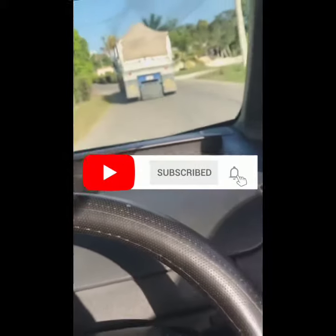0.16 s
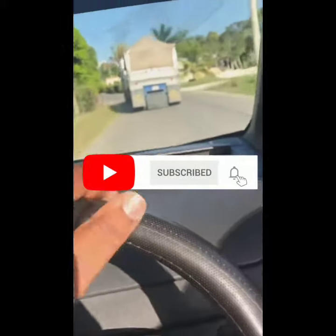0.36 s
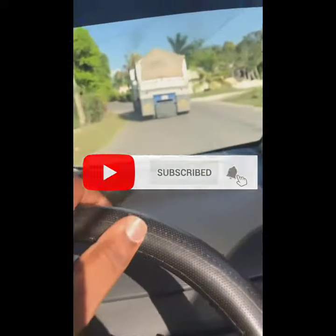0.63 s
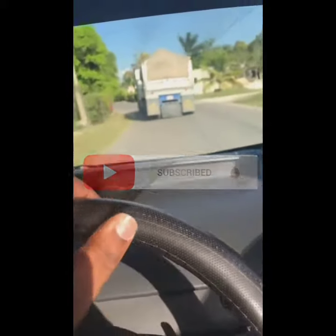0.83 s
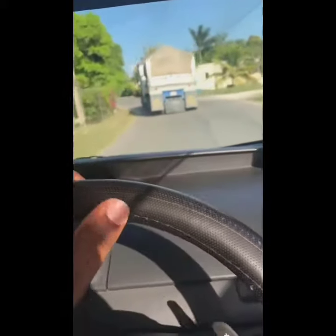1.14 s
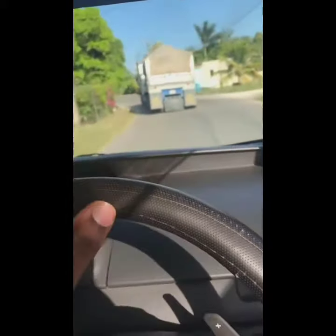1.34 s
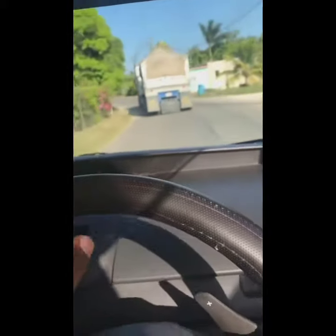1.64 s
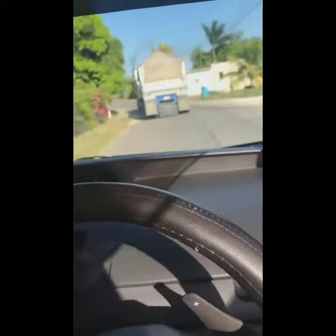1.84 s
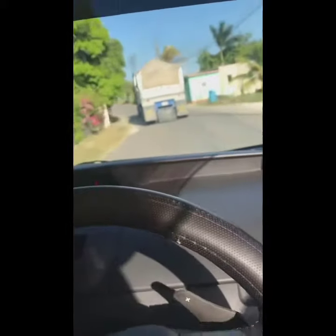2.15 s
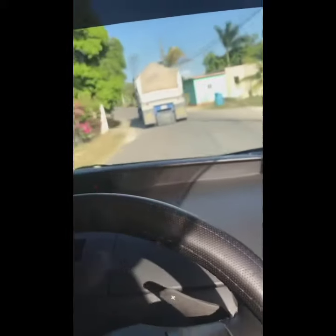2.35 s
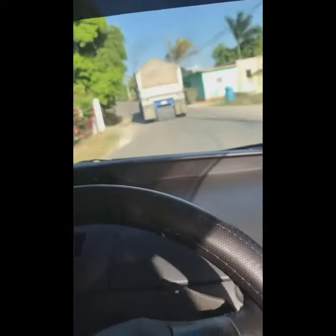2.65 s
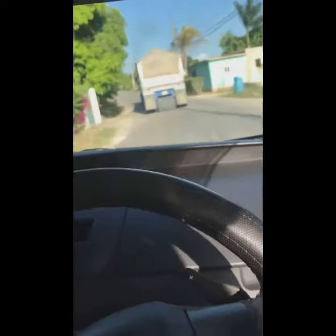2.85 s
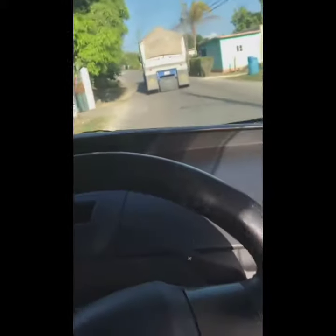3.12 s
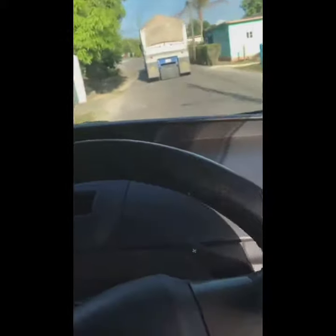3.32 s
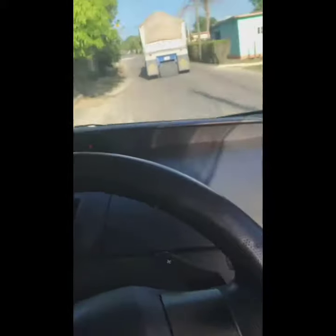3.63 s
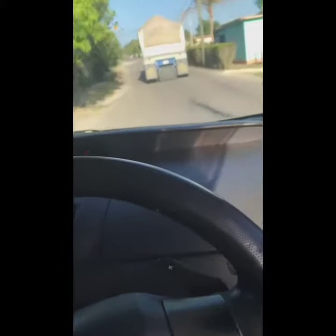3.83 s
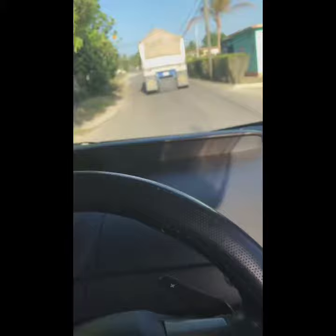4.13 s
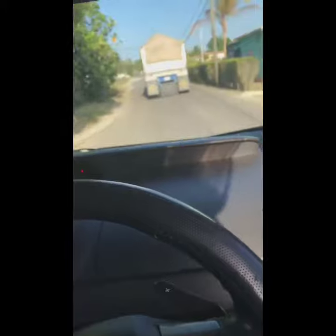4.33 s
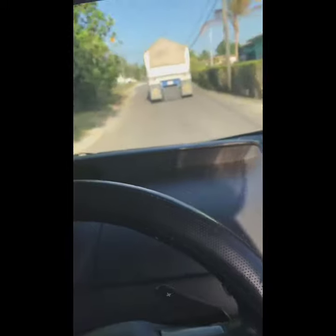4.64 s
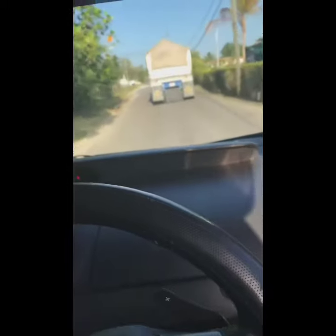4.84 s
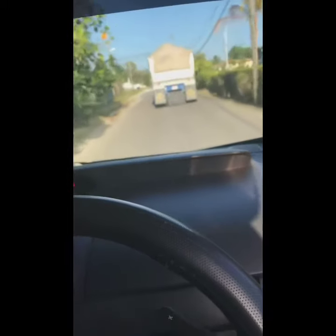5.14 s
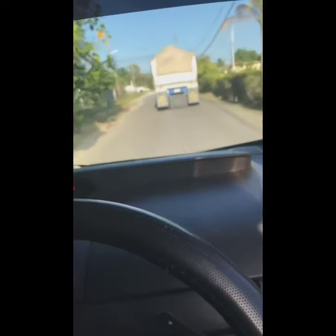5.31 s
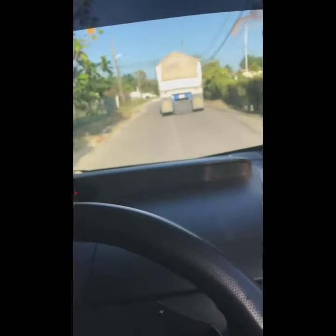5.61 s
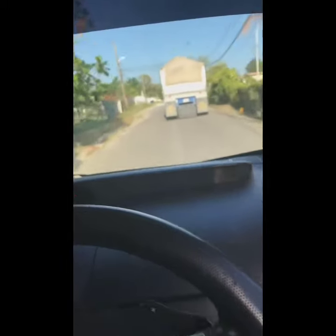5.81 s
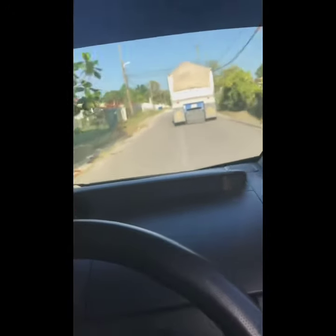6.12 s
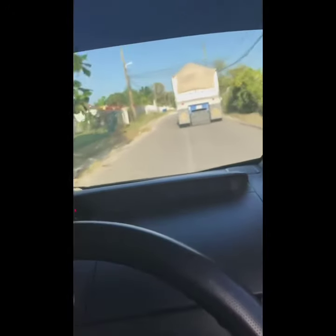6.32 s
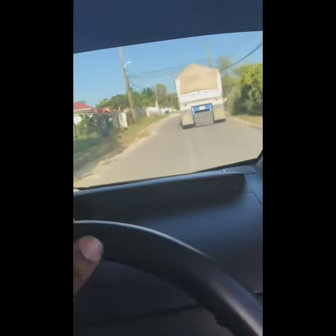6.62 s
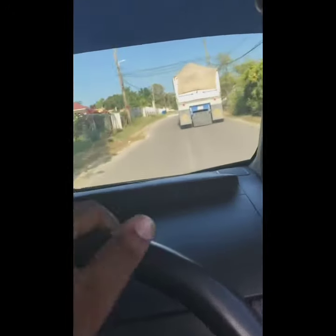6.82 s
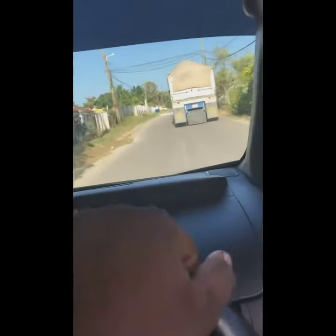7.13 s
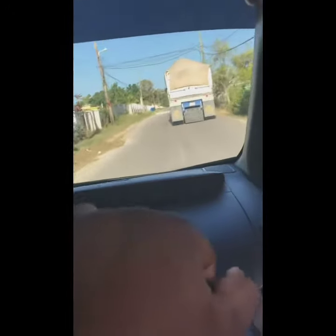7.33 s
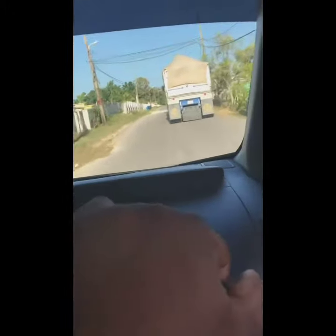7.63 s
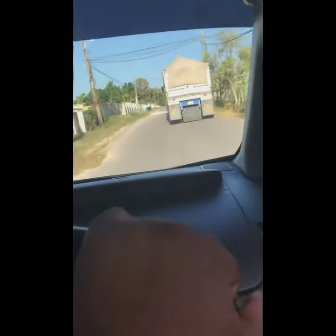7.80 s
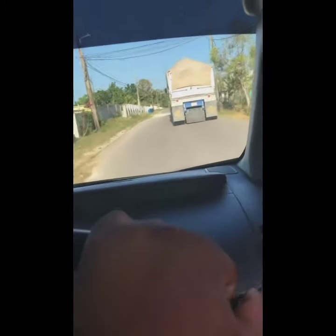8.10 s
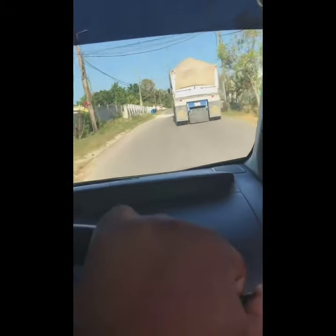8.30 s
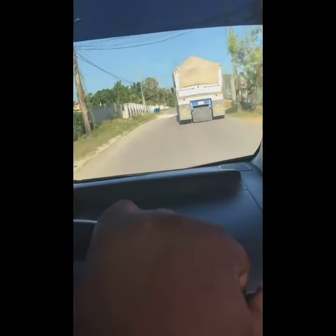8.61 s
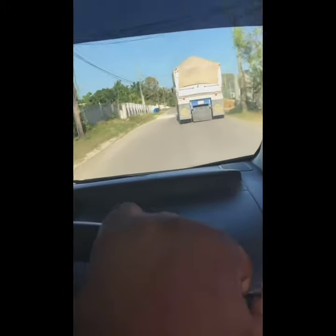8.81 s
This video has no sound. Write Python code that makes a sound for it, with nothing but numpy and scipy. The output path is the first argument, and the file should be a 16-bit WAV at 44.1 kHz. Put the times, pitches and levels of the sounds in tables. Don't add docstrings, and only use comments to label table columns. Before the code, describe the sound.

From inside a moving car with the window open, a heavy diesel truck just ahead pulls hard with a droning, rough exhaust bark. It lifts off for a gear change, turbo whistling thinly, and pulls again, hooting and howling. After another shift it quiets, then a rapid burst of hard exhaust bangs marks engine braking. Finally it lugs in deep, distinct pulses. Tyre hum, low cabin booms and small trim ticks run underneath.

```python
import sys
import numpy as np
from scipy import signal
from scipy.fft import rfft, irfft
from scipy.io import wavfile
from scipy.ndimage import uniform_filter1d

SR = 44100
rng = np.random.default_rng(int(sys.argv[2]) if len(sys.argv) > 2 else 0)


def invert_db(level):
    return 10 ** (np.asarray(level, dtype=float) / 20)


def master_out(mix):
    frames = np.transpose(np.atleast_2d(mix))
    ceiling = np.clip(frames, -1, 1)
    pcm = np.round(ceiling * 32767).astype(np.int16)
    wavfile.write(sys.argv[1], SR, pcm)


N = 395136

# time in [s], engine braking share [0-1], lugging share [0-1], firing pulse depth [0-1].
MANNER = [
    (0, 0, .3, .3),
    (.9, 0, 0, .3),
    (3.3, 0, 0, .3),
    (4.6, .3, .5, .15),
    (4.7, 1, 0, .4),
    (6.3, 1, 0, .45),
    (7, .1, .9, .3),
    (7.6, 0, 1, .78),
    (8.96, 0, 1, .82),
]
# time in [s], firing rate in [Hz].
FIRING_HZ = [(0, 92.6), (.36, 92.3), (.43, 80.5), (.75, 83.2), (1.0, 82.9), (1.25, 80.6), (1.5, 85.3),
             (2.0, 85.8), (2.3, 88.8), (2.7, 88.9), (3.21, 92.2), (3.29, 79.7), (4.0, 78.2), (4.2, 73.5),
             (4.75, 74.5), (5.05, 72), (6.3, 67.4), (8.96, 65.4)]
# time in [s], bark level in [dB].
EFFORT_DB = [(0, -34.5), (.31, -33.5), (.37, -40.5), (.62, -46), (.82, -48), (.92, -41), (1.3, -35),
             (3.16, -33.5), (3.24, -44.5), (3.8, -48), (4.7, -47.5), (4.73, -36), (5.45, -36.5),
             (6.33, -39.5), (6.45, -48), (7.0, -45), (7.7, -34.5), (8.96, -37.5)]
# time in [s], hiss level in [dB].
AIRFLOW_DB = [(0, -55), (.28, -55.5), (.6, -58), (.82, -60.5), (1.02, -61.5), (1.2, -59), (1.6, -58),
              (1.8, -54.5), (2.3, -54), (3.15, -58), (3.8, -68), (4.62, -69.5), (4.8, -62), (5.15, -64),
              (6.4, -65.5), (7.0, -62), (7.7, -61.5), (8.96, -63.5)]
# time in [s], level in [dB].
DRONE_DB = [(0, -32), (.25, -30.5), (.6, -54), (.88, -50), (.98, -27.5), (2.2, -31), (2.8, -32.5),
            (3.25, -35), (3.8, -33.5), (4.9, -38.5), (5.3, -38), (6.2, -26), (6.5, -35.5), (7.1, -31.5),
            (7.5, -23.5), (8.3, -21), (8.6, -27.5), (8.96, -25)]
CYLINDER_DB = [1.8, .6, -.6, -2, -.2, -1]
# share of effort, share of airflow, then level in [dB] pulling, braking, lugging.
STACK_LAW = (0.87, 0.48, -36, -39, -36.5)
BLOCK_LAW = (0.4, 1.23, -48, -46.5, -47)
SECOND_LAW = (0.23, 0.0, -30, -34, -38)
# time in [s], depth in [dB], onset in [dB/s], recovery in [dB/s].
SECOND_DIPS = [(.38, 9.5, 30, 32), (1.08, 12, 118, 148), (1.7, 6, 11, 16), (3.3, 7.5, 40, 28),
               (4.55, 17.5, 29, 47), (6.05, 5, 19, 12), (6.6, 11.5, 34, 10), (7.2, -1, 25, 40)]
# time in [s], peak in [dB], rise in [dB/s], fall in [dB/s].
THIRD_SWELLS = [
    (5.05, -33, 70, 16.5),
    (5.5, -37.5, 8, 58),
    (8.96, -40, 14, 10),
]
# order, start in [s], end in [s], level in [dB].
SINGING = [(2.83, 1.6, 1.98, -48.5), (7.4, 5.4, 5.65, -48), (12.3, 5.46, 5.47, -43),
           (13.4, 5.83, 5.89, -50), (15.6, 5.82, 6.0, -53), (8.9, 5.95, 6.33, -53), (17.8, 6.18, 6.25, -50),
           (4, 7.6, 8.3, -49), (6.95, 7.7, 7.6, -56), (7.33, 7.85, 8.1, -45), (10.5, 7.45, 7.7, -54)]
# level in [dB] pulling, braking, lugging.
KICK_DB = (-15, -11, -8)
KICK_BAND_HZ = (198, 635)
# start in [s], end in [s], level in [dB].
HOOTS = [
    (.9, 1.3, -43),
    (1.35, 2.2, -44.5),
    (2.25, 3.18, -46),
]
# order, width in [Hz], level in [dB] pulling, braking, lugging.
WHINES = [(5.32, 34, -16, -30, -30), (7.4, 30, -30, -9, -30), (9, 36, -30, -5, -20),
          (12.4, 50, -30, -6, -30)]
# centre in [Hz], width in [Hz], level in [dB].
PIPE_MODES = [
    [(469, 160, -12), (662, 61, -8.5), (850, 92, -11.5)],
    [(490, 44, -3.5), (655, 88, -2), (904, 200, -4)],
    [(442, 40, 3.5), (707, 92, 1), (918, 93, -1)],
]
STACK_MODES = [
    [(1064, 710, 1), (1331, 200, 7.5), (1620, 340, -5), (1995, 65, 2.5), (2040, 75, 2.5)],
    [(1080, 81, -3.5), (1225, 95, -2.5), (1436, 240, -9.5), (1707, 71, -2), (1741, 106, -6.5)],
    [(1090, 123, 5.5), (1246, 100, 7), (1453, 310, -2), (1647, 50, 0.5), (1742, 30, 0.5)],
]
BLOCK_MODES = [
    [(2410, 12, -3.5), (2632, 45, -5.5), (2984, 100, -4.5), (3270, 78, -6.5), (3526, 60, -7.5),
     (4270, 52, -11), (4625, 93, -11)],
    [(2550, 50, -14), (2663, 71, 4), (3100, 210, -6), (3560, 290, -12.5), (3860, 74, -15.5),
     (4430, 89, -6.5)],
    [(2134, 19, -2), (2540, 87, -6), (3070, 80, -9.5), (3460, 38, -10), (4200, 90, -27), (4530, 180, -13)],
]
# time in [s], low, middle and high pitch in [Hz].
HOWL_HZ = [(0, 1100, 1305, 1714), (1.2, 1100, 1263, 1688), (1.45, 1100, 1331, 1722),
           (1.8, 1120, 1295, 1725), (2.15, 1120, 1307, 1803), (2.352, 1090, 1250, 1700),
           (2.7, 1070, 1300, 1755), (3.201, 1080, 1305, 1673), (8.96, 1080, 1360, 1704)]
# width in [Hz], level in [dB].
HOWLS = [(100, -11), (110, -6.5), (160, -11.5)]
# start in [s], end in [s], level in [dB].
HOWL_OPEN = [
    [(1.9, 2.0, -7), (2.25, 2.35, 0), (2.55, 2.7, 5)],
    [(1.18, 1.26, 6.5), (1.35, 1.65, 3.5), (1.74, 1.88, 4.5), (2.12, 2.22, -1), (3.28, 3.45, 1)],
    [(0, .32, 11), (1.3, 1.36, 7), (1.6, 1.68, 8.5), (2.1, 2.35, 7.5), (2.5, 2.72, 9)],
]
# frequency in [Hz], density in [dB per Hz].
CLATTER_COLOUR = [(1750, -28.5), (1950, 5.5), (2300, 4.5), (3100, 2), (4100, -1), (4700, -9.5),
                  (5400, -21.5)]
# start in [s], end in [s], extra level in [dB].
BRAKE_RATTLE = [
    (4.76, 5.03, 1.3),
]
# frequency in [Hz], density in [dB per Hz].
HISS_COLOUR = [(4300, -24.5), (5000, -1.5), (6000, -0.5), (6900, -3.5), (7600, -8.5), (8500, -5),
               (9600, -11.5)]
# time in [s], centre in [Hz], level in [dB].
TURBO = [(0, 9300, -89), (.35, 9240, -60), (.5, 9200, -58), (.66, 8670, -59), (.75, 8260, -89),
         (.95, 7800, -83), (1.1, 8030, -60), (1.3, 8580, -61), (1.45, 9000, -58.5), (1.7, 9430, -56),
         (2.1, 9280, -64), (3.1, 9200, -84), (3.5, 8970, -88.5), (8.96, 9000, -87)]
# time in [s], crack level in [dB], thump level in [dB].
BANGS = [(4.681, -29, -36), (4.706, -17, -32), (4.72, -20, -27), (4.73, -18, -14), (4.759, -17, -26),
         (4.744, -22, -34), (4.781, -23, -28), (4.801, -16.5, -17), (4.814, -22, -34), (4.828, -23, -23),
         (4.843, -24, -34), (4.86, -13.5, -25), (4.874, -22, -26), (4.889, -23, -34), (4.903, -22, -34),
         (4.937, -23, -24), (4.977, -25, -21), (5.143, -20, -28), (5.163, -27, -34), (5.191, -21, -28),
         (5.227, -27, -34), (8.188, -22, -34), (8.481, -23, -33)]
# frequency in [Hz], level in [dB], T60 in [s].
BANG_MODES = [(480, -7, .025), (620, -3, .03), (800, -4, .025), (1010, -1, .03), (1200, -4, .02),
              (1500, -10, .015)]
THUMP_MODES = [(188, 0, .07), (150, -14, .05), (115, -4, .08)]
# frequency in [Hz], density in [dB per Hz].
WASH_COLOUR = [(250, -14), (420, 7), (1150, -3.5), (1800, -12.5), (3000, -16.5), (5000, -39)]
# start in [s], end in [s], level in [dB].
SHIELD_BUZZ = [(4.674, 4.684, -59), (4.8, 4.82, -55), (4.86, 4.9, -53), (4.925, 4.95, -53),
               (4.978, 5.03, -55), (5.1, 5.25, -70), (7.68, 7.72, -58), (8.08, 8.18, -57),
               (8.62, 8.96, -58)]
# time in [s], peak in [dB], rise in [dB/s], fall in [dB/s].
VALVE_PUFFS = [(4.735, -53, 400, 150), (4.765, -50, 248, 120), (4.81, -53, 300, 100), (4.875, -51, 403, 90),
               (4.98, -55, 200, 120)]
# frequency in [Hz], density in [dB per Hz].
VALVE_COLOUR = [(1800, -22), (2700, -1.5), (4500, -5), (5200, -11), (8000, -27)]
# time in [s], note in [Hz], level in [dB].
CAR_ENGINE = [(0, 47.4, -38), (.7, 41, -49), (1.1, 37.4, -42), (1.45, 43.5, -31.5), (2.0, 54, -24),
              (2.3, 60.9, -30.5), (2.65, 71.9, -31), (2.9, 69.7, -36.5), (3.15, 60, -33),
              (3.47, 54.2, -25.5), (3.75, 49, -38.5), (4.0, 42.2, -38.5), (4.3, 35.5, -42),
              (5.0, 41.9, -36), (5.55, 41.5, -47), (7.3, 40.6, -37.5), (8.6, 41.7, -39.5),
              (8.96, 42.4, -39)]
# time in [s], tread rate in [Hz].
TREAD_HZ = [(0, 124), (.8, 126.2), (1.7, 125.2), (2.1, 122.6), (2.75, 137.2), (3.4, 139), (4.1, 142.4),
            (5.5, 140.1), (8.96, 139)]
# start in [s], end in [s], level in [dB].
TREAD_SINGS = [
    [(0, 1.8, -39.5), (2.7, 3, -36.5), (5.4, 5, -34.5), (6.62, 6.76, -37.5), (7.55, 10, -44.5)],
    [(2.13, 2.2, -42.5), (3.42, 4.0, -42.5), (5.55, 5.62, -46.5)],
]
# time in [s], peak in [dB], rise in [dB/s], fall in [dB/s].
FLOOR_DRUMS = [
    (6.33, -37, 94, 69),
    (7.3, -39, 9.9, 20),
]
# time in [s], peak in [dB], rise in [dB/s], fall in [dB/s].
BUMPS = [(1.5, -34, 9, 5), (3.8, -30.5, 16, 32), (4.45, -22.5, 33.5, 41), (5.65, -26, 43, 46),
         (6.55, -27.5, 27, 38), (7.6, -31, -2, 10), (8.58, -28, 34, 30)]
# centre in [Hz], width in [Hz], level in [dB].
BOOM_MODES = [(55, 12, -11), (82, 12, 0)]
# frequency in [Hz], density in [dB per Hz].
RUMBLE_COLOUR = [(15, -50.5), (25, -7), (81, -5), (115, -7.5), (156, -6), (186, -12), (284, -16),
                 (394, -23.5), (560, -28), (719, -35), (996, -34), (1420, -40), (1960, -41.5), (7220, -64),
                 (10000, -97.5), (13000, -110), (22000, -120)]
# time in [s], peak in [dB].
TICKS = [(0.0812, -43), (0.2294, -44), (1.1594, -43), (2.8494, -38), (2.9692, -49), (4.673, -44),
         (4.8794, -45), (5.3994, -50), (6.5166, -42), (6.8597, -41), (8.5884, -57)]
# frequency in [Hz], density in [dB per Hz].
TICK_COLOUR = [(1500, -17), (2500, -5.5), (4500, -11), (6500, -15), (9500, -26)]


def truck():
    hz, = in_time(FIRING_HZ)
    effort_db, = in_time(EFFORT_DB)
    air_db, = in_time(AIRFLOW_DB)
    brake, lug, depth = in_time(MANNER)
    shares = np.clip(1 - brake - lug, 0, 1), brake, lug
    second_db = follow(SECOND_LAW, effort_db, air_db, shares)
    tones = firing_tones(hz, second_db)
    kick = sum(share * invert_db(effort_db + db) for share, db in zip(shares, KICK_DB)) * kicks(hz)
    gust = invert_db(0.55 * drift(18))
    bark = exhaust_bark(hz, depth, effort_db, air_db, shares)
    bright = clatter_and_hiss(hz, depth, effort_db, air_db, shares)
    return tones + kick + gust * (bark + fading(bright))


def firing_tones(hz, second_db):
    drone_db, = in_time(DRONE_DB)
    second_db = second_db - swells(SECOND_DIPS, quiet_db=0)
    third_db = swells(THIRD_SWELLS, quiet_db=-56)
    tones = orders(hz, (drone_db, second_db, third_db), flutter_db=1.0, wander=.2)
    hoot_db = stretches(HOOTS, fade_db_per_s=90, quiet_db=-69)
    tones = tones + invert_db(hoot_db) * breathy(5.3 * hz, width_hz=36, steady=.6)
    for order, *row in SINGING:
        level_db = stretches([row], fade_db_per_s=120, quiet_db=-92)
        tones = tones + invert_db(level_db) * orders(order * hz, [0], flutter_db=2.0, wander=1.2)
    return tones


def kicks(hz):
    turns = (np.cumsum(hz) / SR).astype(int)
    strength_db = 2 * np.resize(CYLINDER_DB, N // 200) + rng.standard_normal(N // 200)
    pushes = invert_db(strength_db)[turns] * np.diff(turns, prepend=0)
    return rms_one(bandpass(pushes, 2, *KICK_BAND_HZ))


def exhaust_bark(hz, depth, effort_db, air_db, shares):
    gas = blowdown(hz, depth, uneven_db=0.5)
    pipe = voiced(bandpass(gas, 3, 390, 1000), PIPE_MODES, shares)
    stack = voiced(bandpass(gas, 5, 900, 1900), STACK_MODES, shares)
    for order, width_hz, *manner_db in WHINES:
        level = sum(share * invert_db(db) for share, db in zip(shares, manner_db))
        pipe = pipe + level * breathy(order * hz, width_hz, steady=.3)
    stack_db = follow(STACK_LAW, effort_db, air_db, shares)
    return invert_db(effort_db - 4.5) * pipe + invert_db(stack_db - 3.0) * (stack + shares[0] * howls())


def howls():
    out = 0
    for pitch_hz, (width_hz, db), rows in zip(in_time(HOWL_HZ), HOWLS, HOWL_OPEN):
        level_db = db + stretches(rows, fade_db_per_s=33, quiet_db=-9) + 1.2 * drift(9.9)
        out = out + invert_db(level_db) * breathy(pitch_hz * (1 + .012 * drift(6)), width_hz)
    return out


def clatter_and_hiss(hz, depth, effort_db, air_db, shares):
    knock, rattle, leak = (blowdown(hz, .35 * depth, uneven_db=3) for _ in range(3))
    block = voiced(bandpass(knock, 3, 2150, 5200), BLOCK_MODES, shares)
    extra_db = stretches(BRAKE_RATTLE, fade_db_per_s=120, quiet_db=0)
    clatter = invert_db(-1.5) * colour(rattle, CLATTER_COLOUR) + invert_db(extra_db - 5.0) * block
    clatter_db = follow(BLOCK_LAW, effort_db, air_db, shares) - 1.47 + drift(6.2)
    hiss_db = air_db + 0.5 + 0.72 * drift(6.7)
    return invert_db(clatter_db) * clatter + invert_db(hiss_db) * colour(leak, HISS_COLOUR)


def blowdown(hz, depth, uneven_db):
    turns = np.cumsum(hz) / SR
    strength_db = uneven_db * rng.standard_normal(N // 200) + np.resize(CYLINDER_DB, N // 200)
    puff = invert_db(strength_db)[turns.astype(int)] * np.exp(-1.6 * (turns % 1))
    depth = np.clip(depth, 0, 1)
    return rng.standard_normal(N) * rms_one(1 - depth + depth * puff / puff.mean())


def follow(law, effort_db, air_db, shares):
    effort_share, air_share, *levels_db = law
    manner_db = sum(share * db for share, db in zip(shares, levels_db))
    return manner_db + effort_share * (effort_db + 36) + air_share * (air_db + 58)


def voiced(gas, tables, shares):
    return sum(np.sqrt(share) * resonate(gas, modes) for modes, share in zip(tables, shares))


def fading(x):
    parts = signal.stft(x, nperseg=1024)[2]
    field = uniform_filter1d(rng.standard_normal(parts.shape), 5, axis=0)
    field = uniform_filter1d(field, 7, axis=1)
    return signal.istft(parts * invert_db(2.2 * rms_one(field) - .5), nperseg=1024)[1][:N]


def turbo():
    hz, db = in_time(TURBO)
    width_hz = 340
    pair = breathy(hz, width_hz) + invert_db(-7) * breathy(.948 * hz, width_hz / 2)
    return invert_db(db - 4.5 + 1.5 * drift(15)) * pair


def bangs():
    s, crack_db, thump_db = np.transpose(BANGS)
    ring = strike(s + .001, crack_db - 11, BANG_MODES)
    ring = signal.sosfilt(signal.butter(2, 2600, fs=SR, output="sos"), ring)
    starts = impulses(s, invert_db(crack_db))
    half_width_s = .00028
    u = (np.arange(100) / SR - .0011) / half_width_s
    shock = invert_db(-.5) * signal.lfilter((1 - u * u) * np.exp(-u * u / 2), [1], starts)
    wash = invert_db(-23) * decay(starts, t60_s=.22) * colour(rng.standard_normal(N), WASH_COLOUR)
    return shock + ring + wash + strike(s + .002, thump_db - 2, THUMP_MODES)


def shield():
    buzz_db = stretches(SHIELD_BUZZ, fade_db_per_s=280, quiet_db=-76) + 3.7 * drift(25)
    buzz = invert_db(buzz_db) * breathy(np.full(N, 2540), width_hz=300)
    puffs = invert_db(swells(VALVE_PUFFS, quiet_db=-92)) * colour(rng.standard_normal(N), VALVE_COLOUR)
    return buzz + puffs


def car():
    note_hz, note_db = in_time(CAR_ENGINE)
    note = orders(note_hz, [note_db + 1.5], flutter_db=1.0, wander=.15)
    tread_hz, = in_time(TREAD_HZ)
    sings_db = [stretches(rows, fade_db_per_s=30, quiet_db=-58) for rows in TREAD_SINGS]
    tread = orders(tread_hz, sings_db, flutter_db=1.5, wander=.3)
    floor_db = swells(FLOOR_DRUMS, quiet_db=-69.5)
    floor = invert_db(floor_db) * breathy(np.full(N, 55.5), width_hz=6, steady=2.2)
    boom = invert_db(swells(BUMPS, quiet_db=-50)) * cabin_boom()
    rumble = invert_db(-31) * colour(rng.standard_normal(N), RUMBLE_COLOUR)
    return note + tread + floor + boom + rumble


def cabin_boom():
    boom = resonate(rng.standard_normal(N), BOOM_MODES)
    boom = rms_one(bandpass(boom, 2, 38, 110))
    return rms_one(boom + 1.3 * breathy(np.full(N, 80), width_hz=3.9, steady=1.7))


def ticks():
    s, peak_db = np.transpose(TICKS)
    bursts = decay(impulses(s, invert_db(peak_db - 2.5)), t60_s=.028)
    return bursts * colour(rng.standard_normal(N), TICK_COLOUR)


def rms_one(x):
    return x / np.sqrt(np.mean(x ** 2) + 1e-20)


def in_time(rows):
    s, *columns = np.transpose(rows)
    return [np.interp(np.arange(N) / SR, s, c) for c in columns]


def swells(rows, quiet_db):
    t = np.arange(N) / SR
    peaks = [db - np.where(t < s, abs(rise), -abs(fall)) * (s - t) for s, db, rise, fall in rows]
    return np.maximum(np.max(peaks, axis=0), quiet_db)


def stretches(rows, fade_db_per_s, quiet_db):
    t = np.arange(N) / SR
    held = []
    for start, end, db in rows:
        outside_s = np.maximum(np.maximum(start - t, t - end), 0)
        held.append(db - fade_db_per_s * outside_s)
    return np.maximum(np.max(held, axis=0), quiet_db)


def drift(rate_hz):
    r = np.exp(-80 * np.pi * rate_hz / SR)
    slow = signal.lfilter([1], [1, -2 * r, r * r], rng.standard_normal(N // 40 + 2002))[2000:]
    return np.interp(np.arange(N) / 40, np.arange(len(slow)), rms_one(slow))


def bandpass(x, order, low_hz, high_hz):
    return signal.sosfilt(signal.butter(order, [low_hz, high_hz], "band", fs=SR, output="sos"), x)


def colour(x, points):
    hz, db = np.transpose(points)
    grid_hz = np.maximum(np.fft.rfftfreq(N, 1 / SR), 1)
    gain_db = np.interp(np.log(grid_hz), np.log(hz), db)
    return rms_one(irfft(rfft(x) * invert_db(gain_db), N))


def resonate(x, modes):
    out = 0
    for k, (hz, width_hz, db) in enumerate(modes):
        r = np.exp(-np.pi * width_hz / SR)
        b = (1 - r * r) / 2 * np.array([1, 0, -1])
        a = [1, -2 * r * np.cos(2 * np.pi * hz / SR), r * r]
        out = out + (-1) ** k * invert_db(db) * signal.lfilter(b, a, x)
    return rms_one(out)


def orders(hz, levels_db, flutter_db, wander):
    turn = 2 * np.pi * np.cumsum(hz) / SR
    out = 0
    for k, db in enumerate(levels_db, 1):
        level = np.sqrt(2) * invert_db(db + flutter_db * drift(4))
        out = out + level * np.sin(k * turn + wander * drift(3))
    return out


def breathy(hz, width_hz, steady=0):
    breath = signal.sosfilt(signal.butter(2, width_hz / 2, fs=SR, output="sos"), rng.standard_normal(N))
    envelope = np.sqrt(2) * rms_one(rms_one(breath) + steady)
    return envelope * np.sin(2 * np.pi * np.cumsum(hz) / SR)


def impulses(s, heights):
    out = np.full(N, 1e-18)
    out[(s * SR).astype(int)] = heights
    return out


def decay(starts, t60_s):
    return signal.lfilter([1], [1, -invert_db(-60 / (t60_s * SR))], starts)


def strike(s, peak_db, modes):
    spread_db = 2 * rng.standard_normal((len(s), len(modes)))
    out = np.zeros(N)
    for k, (hz, db, t60_s) in enumerate(modes):
        clicks = impulses(s, (-1) ** k * invert_db(peak_db + db + spread_db[:, k]))
        r, w = invert_db(-60 / (t60_s * SR)), 2 * np.pi * hz / SR
        out += signal.lfilter([0, np.sin(w)], [1, -2 * r * np.cos(w), r * r], clicks)
    return out


def scene():
    return (truck() + turbo() + bangs() + shield() + car() + ticks())[None]


def top_cut(x):
    return signal.sosfilt(signal.butter(12, 10590, fs=SR, output="sos"), x)


def record(dry):
    x = signal.sosfilt(signal.butter(4, 36.5, "high", fs=SR, output="sos"), dry)
    x = signal.sosfilt(signal.ellip(14, .3, 70, 9660, fs=SR, output="sos"), x)
    return top_cut(x)


dry = scene()
out = record(dry)
master_out(out)
```